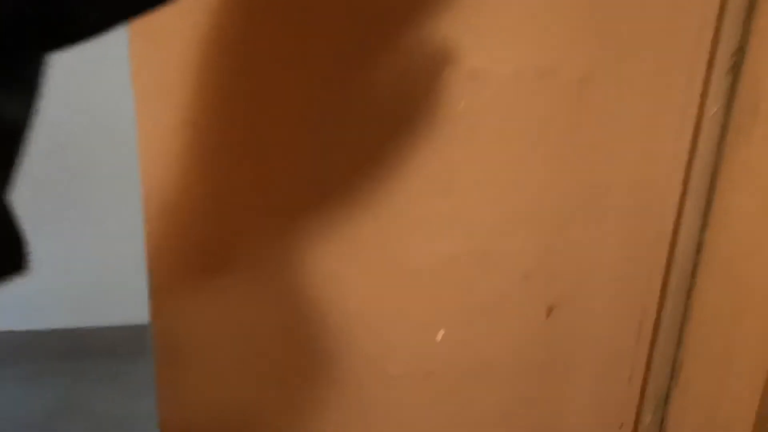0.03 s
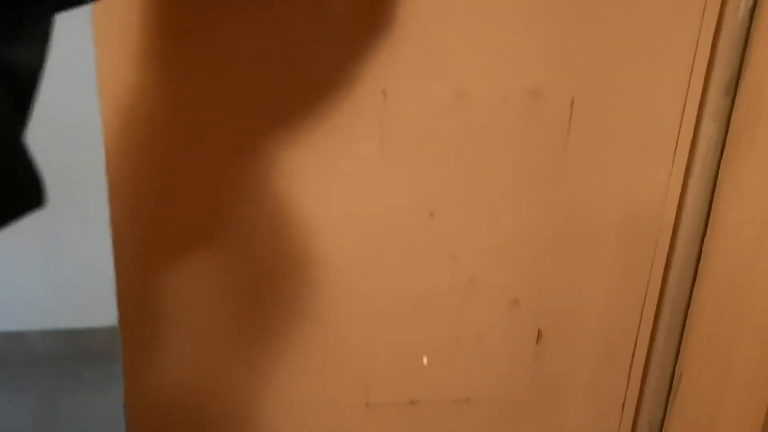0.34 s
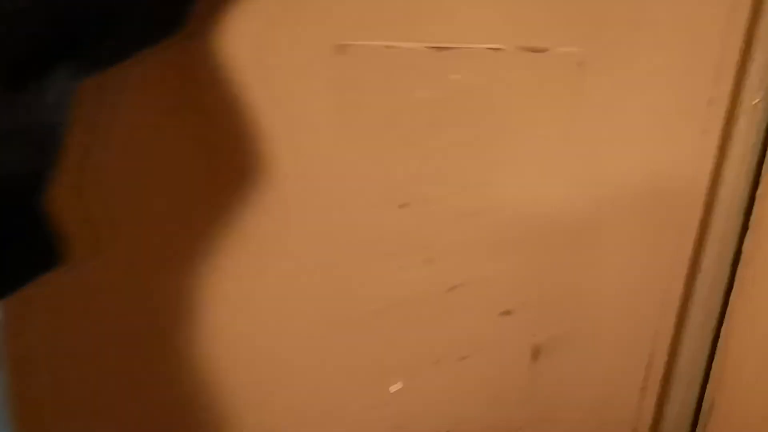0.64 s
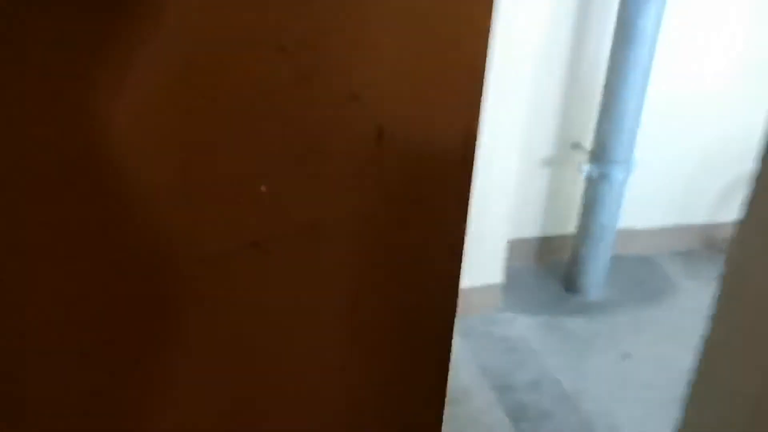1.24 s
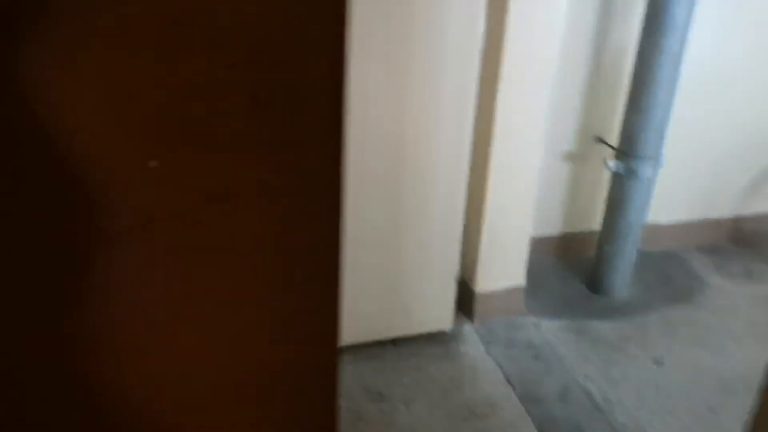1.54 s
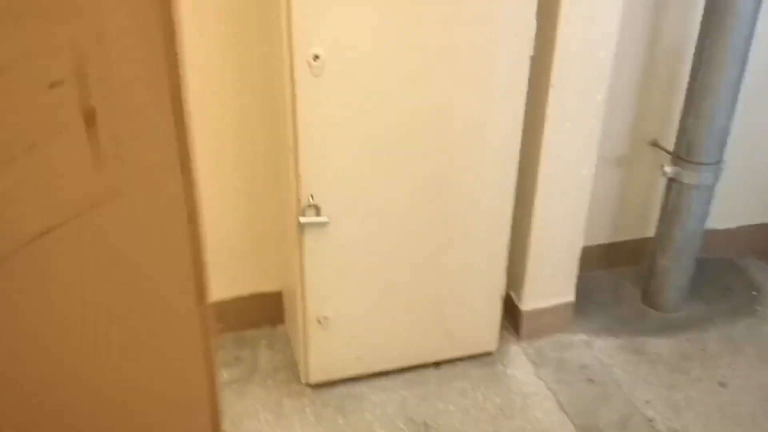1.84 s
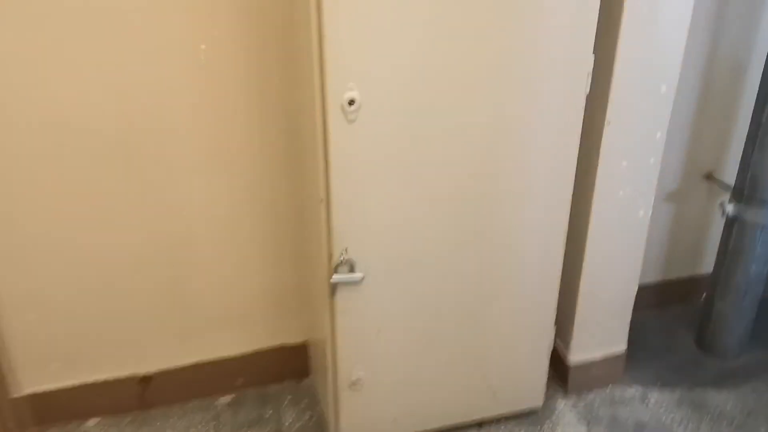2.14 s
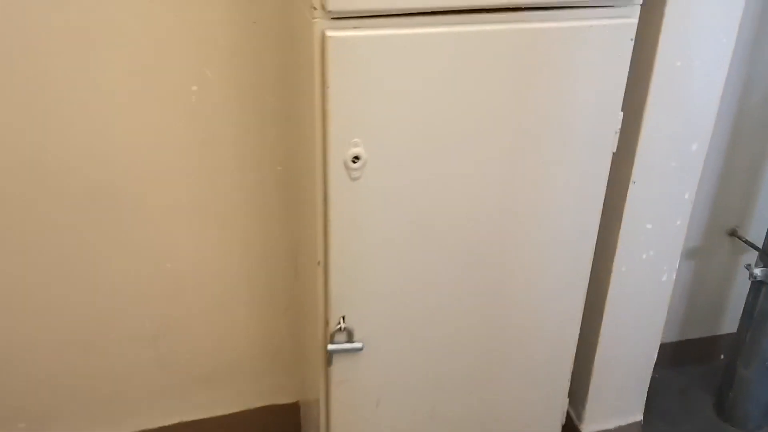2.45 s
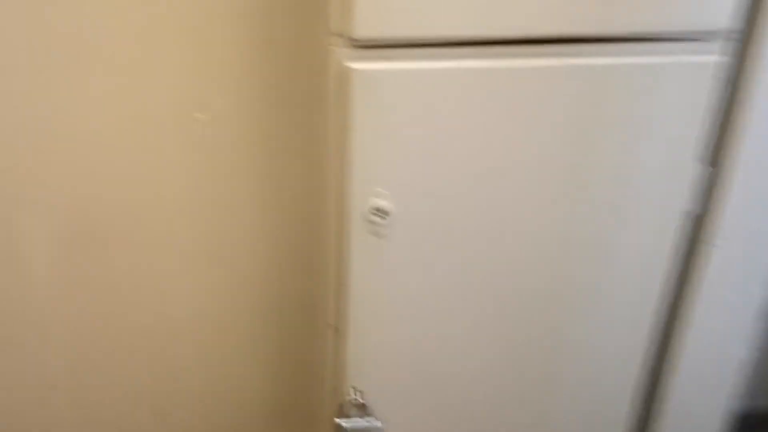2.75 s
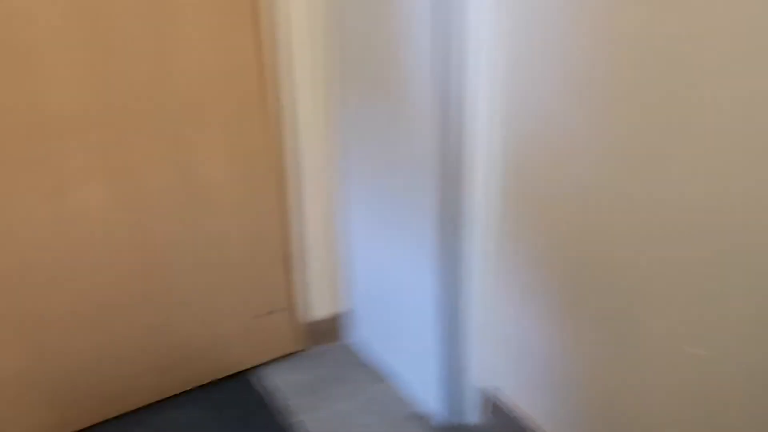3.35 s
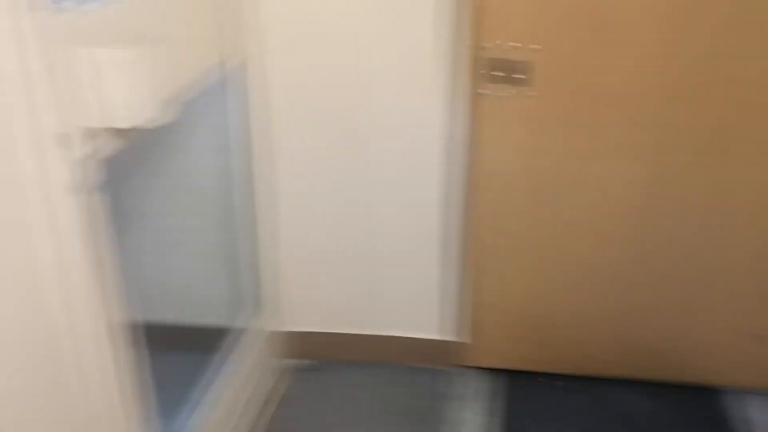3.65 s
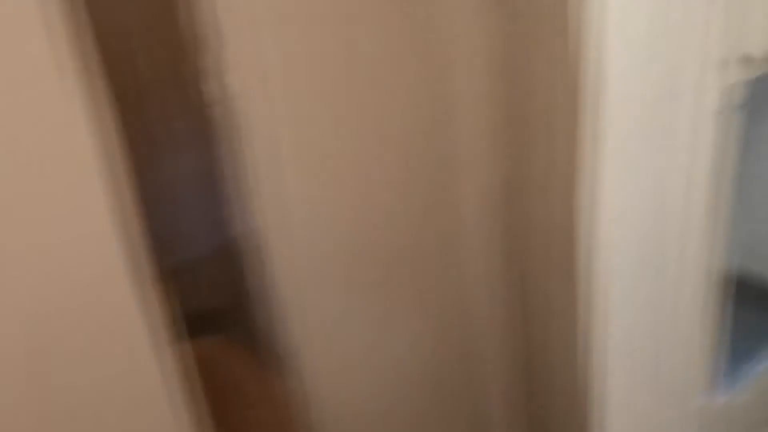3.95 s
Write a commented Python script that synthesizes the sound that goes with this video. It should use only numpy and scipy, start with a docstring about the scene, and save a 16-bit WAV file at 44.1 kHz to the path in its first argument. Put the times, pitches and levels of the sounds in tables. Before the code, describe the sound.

A door latch scrapes and clacks twice as the wooden door booms, echoing in a hard-walled corridor. Then keys clink, shoes scuff on concrete and a jacket rustles close to a hand-held microphone, over low handling rumble.

```python
"""Through a wooden door into a corridor

A hard-walled corridor, heard on the move from the two microphone ports of a hand-held phone.
The door leaf booms; the latch bolt scrapes and clacks twice, ringing with its plate, and the walls answer.
Then keys knock together, shoes scuff on concrete and a jacket rustles, its sleeve right by the phone.
Handling rumble and a soft hiss lie underneath; the left port is muffled in the lower treble."""
import sys
import numpy as np
from scipy import signal
from scipy.fft import rfft, irfft
from scipy.io import wavfile
from scipy.ndimage import uniform_filter1d

SR = 44100
rng = np.random.default_rng(int(sys.argv[2]) if len(sys.argv) > 2 else 0)


def digitize_waveform(pressure):
    """Quantize a signal to 16-bit integers and store it at the path in sys.argv[1].

    Rows of a 2-D input are taken as channels; values are limited to [-1, 1].
    """
    field = np.atleast_2d(pressure).T
    bounded = np.clip(field, -1, 1)
    quanta = np.round(bounded * 32767).astype(np.int16)
    wavfile.write(sys.argv[1], SR, quanta)


N = 176400

# Course of the handling rumble and of the hiss: time_s, relative_level_db
RUMBLE_LEVELS = [(0, -18), (.42, -19), (.7, -30.5), (.98, -36.5), (1.29, -37.5), (1.34, -28), (1.45, -33.5),
                 (1.9, -47.5), (2.2, -36), (2.28, -27), (2.37, -25), (2.41, -39.5), (2.8, -48.5),
                 (2.92, -28.5), (3.5, -35), (3.66, -36.5), (3.81, -25.5), (3.85, -41), (4, -22)]
HISS_LEVELS = [(0, -32.5), (.3, -48.5), (.55, -55), (.9, -45), (1.4, -46), (2.2, -43.5), (2.75, -47),
               (3.5, -41), (4, -44)]
# Dull thuds of door and feet: start_s, rise_s, hold_s, t60_s, relative_level_db, tilt_db_per_octave
THUDS = [(-.02, 0.015, 0.16, 1.25, -24, -4), (0.315, 0.022, 0.017, 0.67, -29, -7.5),
         (0.581, 0.027, 0.057, 0.34, -39, -7), (0.72, 0.027, 0.014, 1.9, -34, -1.5),
         (0.945, 0.019, 0.019, 0.85, -36, 1), (1.596, 0.12, 0.066, 0.84, -39, 0),
         (1.73, 0.01, 0.0073, 0.55, -41.5, -9), (2.097, 0.016, 0.026, 0.66, -46.5, -11),
         (2.873, 0.037, 0.1, 3.7, -42.5, 4.5), (3.206, 0.035, 0.27, 1.33, -37.5, 7.5),
         (3.903, 0.095, 0.045, 0.35, -44.5, -10.5)]
# Standing waves of the corridor: pitch_hz, width_hz, gain_db
CORRIDOR_MODES = [(109, 22, -1.5), (141.1, 13.7, -0.5), (172.5, 11, -7), (206.7, 9.2, -4.5),
                  (236.1, 4.9, -7.5), (265.5, 24.4, -3), (303.8, 14.3, -6), (346.6, 17, -9.5),
                  (456, 160, -18), (530.7, 25, -19)]
# Jacket swishes: start_s, rise_s, hold_s, t60_s, level_db, relative_sheen_db
SWISHES = [(0.646, 0.071, .03, 0.37, -41, -0.5), (0.85, 0.018, 0.046, 1, -44, -3),
           (1.109, 0.071, 0.012, 0.13, -42.5, 6.5), (1.942, 0.11, 0.14, 1, -58, 9.5),
           (2.861, 0.025, 0.14, 1, -38.5, -13), (3.135, 0.056, 0.12, .5, -40.5, -1.5),
           (3.254, 0.035, 0.045, 0.79, -36, 2.5), (3.378, 0.025, 0.023, 0.29, -46, 6.5),
           (3.636, 0.049, 0.02, 0.59, -43, -25), (3.895, 0.0066, 0.13, .5, -39, -5)]
# Cloth and soles dragging with a narrow rasp: start_s, rise_s, hold_s, t60_s, level_db, pitch_hz
RASPS = [(1.155, .015, .015, 0.13, -38, 1970), (2.943, 0.021, 0.022, .15, -44, 2000),
         (3.418, .02, .03, 0.69, -45, 1090)]
# Sleeve brushes, shoe scuffs, door boom and bolt scrapes: start_s, rise_s, hold_s, t60_s, level_db
SLEEVE_BRUSHES = [(1.15, 0.034, .02, 0.22, -62), (2.86, 0.007, .04, 0.56, -51.5),
                  (3.06, 0.014, 0.14, 0.43, -53), (3.27, .02, 0.16, 0.26, -55),
                  (3.897, 0.0033, 0.015, 0.61, -56)]
SHOE_SCUFFS = [(.94, 0.028, 0.011, 0.14, -37), (1.41, 0.0072, 0.017, 1, -45),
               (1.53, 0.077, 0.064, 0.37, -30.5), (1.71, 0.029, 0.0084, 0.54, -35),
               (2.05, 0.017, 0.1, 0.65, -42), (2.27, 0.018, 0.015, 0.69, -43),
               (3.18, 0.021, 0.063, 0.32, -42), (3.41, 0.0099, 0.023, 1, -42.5)]
DOOR_BOOM = [(-0.059, 0.12, 0.027, 0.73, -9.5)]
BOLT_DRAGS = [(-.02, 0.017, 0.093, 0.53, -38.5), (.06, 0.012, 0.051, 0.95, -31.5),
              (.605, 0.003, 0.019, 0.32, -35.5)]
# Small dry taps: start_s, level_db, pitch_hz, width_hz, t60_s
TAPS = [(1.254, -33.5, 2780, 260, 0.13), (1.6489, -27, 3850, 1480, 0.02),
        (2.6635, -30.5, 2760, 1390, 0.011), (2.886, -31, 2460, 1800, 0.026)]
# Key contacts: start_s, long_key_db, short_key_db, key_ring_db
CLINKS = [(1.078, -40, -79, -75), (1.126, -42.5, -62, -75), (1.431, -40.5, -38.5, -55),
          (1.537, -43, -29, -52), (1.5693, -44, -29, -50.5), (1.585, -45, -28, -61),
          (1.592, -31.5, -31, -62), (1.604, -30.5, -37, -64), (1.628, -38, -31, -72),
          (1.7254, -32.5, -62, -78), (1.75, -29.5, -32.5, -55), (2.0612, -28.5, -43, -55),
          (2.1027, -28, -35.5, -50), (2.2643, -38, -43, -73), (2.2843, -37, -46, -75),
          (2.424, -46, -35.5, -72), (2.5362, -52, -41, -60.5), (2.8932, -32.5, -38, -59),
          (3.0096, -32.5, -53, -58), (3.0765, -23.5, -52, -53), (3.111, -26, -60, -82),
          (3.1814, -31, -38, -55)]
# Snaps of the latch spring: start_s, level_db, t60_s
SNAPS = [(0.1634, -36, .05), (0.702, -44, 0.36)]
# Latch clacks: start_s, noise_db, bolt_db, plate_db, build_up_s, tilt_db_per_octave
CLACKS = [(0.1634, -14, -21, -44, 0.017, 0.4), (0.7016, -16, -33.5, -22.5, 0.0049, 0.65)]
# Modes of two keys, their ring, the bolt and the lock plate: pitch_hz, gain_db, t60_s
LONG_KEY_MODES = [(1478, -19, 0.27), (2704, -5, 0.19), (4180, -11, 0.18), (6230, -1.5, 0.14),
                  (6270, -15.5, 0.11)]
SHORT_KEY_MODES = [(2550, -5, 0.1), (4490, -0.5, 0.076), (4290, -9.5, 0.044), (5250, -8, 0.078),
                   (8060, -20, 0.068), (11940, -29, 0.066)]
KEY_RING_MODES = [(7100, 2, 0.18), (8450, -4, 0.11), (9470, -7.5, .11), (10460, -3, 0.098),
                  (12380, -5, .11), (14000, -16, 0.072), (14340, -10, 0.074)]
BOLT_MODES = [(406, -5.5, 0.57), (449.6, -8.5, 0.9), (970, -20, 0.15), (1810, 2, 0.22), (1865, 1.5, 0.18),
              (2520, 10.5, 0.16), (2610, 9, 0.18), (2747, 7, 0.18), (2995, 7, 0.16), (3340, -1.5, 0.2),
              (3460, 2, 0.14), (4010, -7.5, 0.32)]
PLATE_MODES = [(437, -5, 0.34), (650, -11.5, 0.26), (980, -7, 0.25), (1169, -4.5, 0.42), (1408, 3.5, 0.28),
               (1595, 1.5, .16), (1780, 1, 0.12), (2040, 2, 0.2), (2430, 1, 0.2), (3100, -8.5, 0.18),
               (4300, -8, 0.44)]
# Spectrum of the noise in each source: frequency_hz, gain_db
RUMBLE_COLOUR = [(12, 8.5), (25, 15), (45, 5.5), (65, 4.5), (100, -3.5), (140, -5.5), (300, -63)]
HISS_COLOUR = [(59, -44), (100, 10), (733, -15), (814, -5.5), (1320, -6.5), (1650, -4), (2860, 0.5),
               (3110, -4), (4940, -7), (6620, -19), (7510, -20.5), (10900, -39), (15000, -35)]
THUD_COLOUR = [(60, 6.5), (105, -16), (145, 2.5), (200, -0.5), (260, -6), (340, -17.5), (450, -10.5),
               (650, -19.5), (1500, -68.5)]
CLOTH_COLOUR = [(300, -10.5), (700, -10.5), (1300, -7), (2000, -1.5), (2800, 1.5), (4000, -6.5),
                (5500, -12), (8200, -25), (10000, -35), (15000, -38)]
SHEEN_COLOUR = [(1000, -44), (2400, -12), (3500, 4), (4800, -1.5), (6300, -7.5), (8500, -20), (10000, -29),
                (15000, -39)]
BRUSH_COLOUR = [(1500, -19), (4500, 0), (8000, -3), (11000, -12), (15000, -13)]
SCUFF_COLOUR = [(150, -3), (400, -7), (600, -3), (900, -1), (1500, -3), (2600, -0.5), (4000, -14.5),
                (6000, -23), (15000, -61)]
TICK_COLOUR = [(500, -2), (2500, -2), (5000, -17), (8000, -12), (11000, 5), (15000, -12)]
DRAG_COLOUR = [(500, -32), (950, -5), (1500, -9.5), (2200, 5), (2900, -1.5), (4000, -5), (5500, -18),
               (8500, -29.5), (10200, -57)]
SNAP_COLOUR = [(2000, -24), (6000, -7), (8500, 8), (10000, -3), (15000, -13)]
CLACK_COLOUR = [(100, -23), (200, -10), (380, -0.5), (600, -10), (1000, -1), (1450, -9.5), (1900, -1.5),
                (2800, 3.5), (4000, -4), (5600, -9), (8500, -25.5), (10500, -50), (15000, -56)]
# Response of the left microphone port: frequency_hz, gain_db
LEFT_PORT = [(150, 0.5), (400, -2.5), (800, -0.5), (1300, -3.5), (2300, -11), (4300, -16), (6200, -9),
             (7300, 0.5), (8200, 7), (10000, 0)]

CONTACT_S = 0.0006  # onset of metal striking metal


def undb(db):
    """Decibels to gain."""
    return 10 ** (np.asarray(db) / 20)


def unit(x):
    """Scale to an rms of 1."""
    return x / np.sqrt(np.mean(x ** 2))


def clock():
    """Time of every sample in seconds."""
    return np.arange(N) / SR


def freqs():
    """Frequency of every bin, at least 1 Hz."""
    return np.maximum(np.arange(N // 2 + 1) * SR / N, 1)


def colour(x, points):
    """Filter by (frequency_hz, gain_db) points."""
    hz, db = np.array(points, float).T
    gain = undb(np.interp(np.log(freqs()), np.log(hz), db))
    return irfft(rfft(x) * gain, N)


def resonance(x, hz, width_hz):
    """Band-pass with steep skirts."""
    f = freqs()
    return irfft(rfft(x) / (1 + ((f / hz - hz / f) * hz / width_hz) ** 2), N)


def noise(points, alike_below_hz=390):
    """Coloured noise at the two ports, alike in the bass and unrelated in the treble."""
    mid, side = rfft(rng.standard_normal((2, N)))
    alike = 1 / (1 + (freqs() / alike_below_hz) ** 4)
    mid, side = mid * np.sqrt(1 + alike), side * np.sqrt(1 - alike)
    ports = irfft(np.array([mid + side, mid - side]), N)
    return unit(colour(ports, points))


def fall(age_s, t60_s):
    """Full level until age zero, then 60 dB down every t60_s."""
    return np.exp(-np.log(1000) * np.maximum(age_s, 0) / t60_s)


def decay(start_s, t60_s):
    """Sudden onset and exponential fall."""
    age = clock() - start_s
    return (age >= 0) * fall(age, t60_s)


def swells(rows):
    """Rise, hold and release from the first five columns of each row, summed in power."""
    t, power = clock(), 0
    for start, rise, hold, t60, db, *_ in rows:
        attack = np.clip((t - start) / rise, 0, 1)
        power += (undb(db) * attack * fall(t - start - rise - hold, t60)) ** 2
    return np.sqrt(power)


def grain(rate_hz, spread_db):
    """Random flicker of level; when fast, the catch and slip of a rubbing surface."""
    steps = rng.standard_normal(N // 8)
    return unit(undb(spread_db * np.interp(clock() * rate_hz, np.arange(len(steps)), steps)))


def wander(t, rate_hz):
    """Drifting amplitude and phase at each port."""
    steps = rng.standard_normal((2, 1000)) + 1j * rng.standard_normal((2, 1000))
    return np.array([np.interp(t * rate_hz, np.arange(len(port)), port) for port in steps])


def struck_metal(modes, scatter_db, room_db, room_t60_s, chatter=0, detune=0):
    """One second of ringing modes; chatter makes them flutter, the walls return them adrift in phase."""
    t = np.arange(SR) / SR
    out = np.zeros((2, SR))
    echo = undb(room_db) * (1 - np.exp(-t / 0.0042)) * fall(t, room_t60_s)
    flutter, paths = wander(t, rate_hz=263.6), wander(t, rate_hz=91.84)
    for hz, db, t60 in modes:
        gain = undb(db + scatter_db * rng.standard_normal())
        phase = rng.uniform(0, 2 * np.pi, (2, 1))
        shift = rng.integers(SR)
        pitch_hz = hz * (1 + detune * rng.standard_normal())
        direct = np.exp(1j * phase) + chatter * np.roll(flutter, shift, axis=1)
        direct *= fall(t, t60) / np.hypot(1, chatter)
        reflected = echo * np.roll(paths, shift, axis=1)
        out += gain * ((direct + reflected) * np.exp(2j * np.pi * pitch_hz * t)).imag
    return out * (1 - np.exp(-(t / CONTACT_S) ** 2))


def add(out, start_s, x):
    """Mix a short sound in at a time."""
    i = int(start_s * SR)
    out[:, i:i + x.shape[1]] += x[:, :N - i]


def hiss():
    """A soft, wavering hiss behind everything, dipping while the door opens."""
    level_db = np.interp(clock(), *np.array(HISS_LEVELS).T)
    return undb(level_db) * noise(HISS_COLOUR) * grain(rate_hz=18, spread_db=0.9)


def handling_rumble(trim_db=-3.5):
    """The hand shifts on the body of the phone."""
    level_db = np.interp(clock(), *np.array(RUMBLE_LEVELS).T)
    return undb(level_db + trim_db) * noise(RUMBLE_COLOUR)


def corridor_thuds(diffuse_db=-5, standing_db=-7.5):
    """Dull blows excite the standing waves of the corridor and a diffuse murk between them."""
    out = undb(diffuse_db) * swells(THUDS) * noise(THUD_COLOUR)
    push = noise(THUD_COLOUR)
    for hz, width, db in CORRIDOR_MODES:
        blows = [(*shape, level + tilt * np.log2(hz / 200)) for *shape, level, tilt in THUDS]
        out += undb(standing_db + db) * swells(blows) * unit(resonance(push, hz, width))
    return out


def jacket():
    """The walker's jacket swishes, with a brighter sheen when the cloth slides fast."""
    cloth = swells(SWISHES) * noise(CLOTH_COLOUR)
    sheen_rows = [(*shape, db + sheen_db) for *shape, db, sheen_db in SWISHES]
    sheen = swells(sheen_rows) * noise(SHEEN_COLOUR)
    return (cloth + sheen) * grain(rate_hz=430, spread_db=2.1)


def sleeve():
    """The sleeve brushes right beside the ports with a fine crackle."""
    return swells(SLEEVE_BRUSHES) * noise(BRUSH_COLOUR) * grain(rate_hz=590, spread_db=4)


def rasps():
    """Cloth and soles catch and slip as they drag, each rasp in one narrow resonance."""
    slips = rng.standard_normal((2, N)) * grain(rate_hz=240, spread_db=6.5)
    return sum(swells([shape]) * unit(resonance(slips, hz, width_hz=0.12 * hz)) for *shape, hz in RASPS)


def shoes():
    """Soles scuff on the gritty concrete below the phone."""
    return swells(SHOE_SCUFFS) * noise(SCUFF_COLOUR) * grain(rate_hz=520, spread_db=2)


def taps():
    """Light knocks of small hardware and grit, each in one resonance."""
    out = np.zeros((2, N))
    for start, db, hz, width, t60 in TAPS:
        push = rng.standard_normal((2, N))
        knock = resonance(push * decay(start, t60), hz, width)
        out += undb(db) * knock / np.std(resonance(push, hz, width))
    return out


def keys(port_spread_db=1.1, bounce_db=-7, bounce_gap_s=0.022, clash_db=-5, tick_db=6):
    """Two keys and their ring knock together: a bright tick, a rough clash, a tone, one weak bounce."""
    out = np.zeros((2, N))
    for part, modes in enumerate((LONG_KEY_MODES, SHORT_KEY_MODES, KEY_RING_MODES)):
        clashes = np.zeros(N)
        for start, *levels_db in CLINKS:
            port_gains = undb(levels_db[part] + port_spread_db * rng.standard_normal((2, 1)))
            tone = port_gains * struck_metal(modes, scatter_db=2, room_db=-25.5, room_t60_s=0.96,
                                             chatter=0.62, detune=0.002)
            add(out, start, tone)
            add(out, start + bounce_gap_s * rng.uniform(0.5, 1.7), undb(bounce_db) * tone)
            clashes += undb(levels_db[part]) * decay(start, t60_s=0.039)
        push = rng.standard_normal((2, N))
        rattle = unit(sum(undb(db) * resonance(push, hz, width_hz=450) for hz, db, _ in modes))
        out += undb(clash_db) * uniform_filter1d(clashes, int(CONTACT_S * SR)) * rattle
    ticks = sum(undb(ring_db) * decay(start, t60_s=0.019) for start, _, _, ring_db in CLINKS)
    return out + undb(tick_db) * ticks * noise(TICK_COLOUR)


def door_boom(pitch_hz=52.95, overtone_db=-18):
    """The door leaf shudders at its lowest mode, with a weaker overtone."""
    phase = 2 * np.pi * pitch_hz * clock()
    overtone = undb(overtone_db) * np.sin(1.5 * phase + rng.uniform(0, 2 * np.pi))
    return swells(DOOR_BOOM) * np.sqrt(2) * (np.sin(phase) + overtone)


def bolt_drag():
    """The bolt scrapes along its plate before each clack."""
    return swells(BOLT_DRAGS) * noise(DRAG_COLOUR) * grain(rate_hz=810, spread_db=0.2)


def spring_snap():
    """The latch spring puts a bright snap on top of each clack."""
    return noise(SNAP_COLOUR) * sum(undb(db) * decay(start, t60) for start, db, t60 in SNAPS)


def latch(corridor_db=-16):
    """At arm's length the bolt snaps and the plate rings; door leaf and corridor carry the clack on."""
    out = np.zeros((2, N))
    for start, noise_db, bolt_db, plate_db, build_up_s, tilt in CLACKS:
        bright = [(hz, db + tilt * np.log2(hz / 2000)) for hz, db in CLACK_COLOUR]
        dull = [(hz, db - 10 * np.log2(1 + hz / 1500)) for hz, db in bright]
        clack = noise(bright) * decay(start, t60_s=0.31)
        tail = undb(corridor_db) * noise(dull) * decay(start, t60_s=0.99)
        hit = undb(noise_db) * (clack + tail)
        for modes, ring_db in (BOLT_MODES, bolt_db), (PLATE_MODES, plate_db):
            tone = struck_metal(modes, scatter_db=1, room_db=-13, room_t60_s=0.48)
            add(hit, start, undb(ring_db) * tone)
        out += hit * np.sqrt(np.clip((clock() - start) / build_up_s, 0, 1))
    return out


def scene():
    """Door, walker and background as they reach the phone."""
    door = door_boom() + bolt_drag() + latch() + spring_snap()
    walker = taps() + keys() + jacket() + shoes() + rasps() + sleeve()
    return door + walker + corridor_thuds() + hiss() + handling_rumble()


def record(dry, leak_share=0.22, leak_hz=2350, leak_lag_s=0.0006, top_hz=15200):
    """The left port hears a band of the right port's sound late and loses presence; both lose the top."""
    share = leak_share / (1 + np.log2(freqs() / leak_hz) ** 4)
    left, right = rfft(dry)
    leak = share * right * np.exp(-2j * np.pi * freqs() * leak_lag_s)
    left = irfft(np.sqrt(1 - share ** 2) * left + leak, N)
    ports = np.array([colour(left, LEFT_PORT), dry[1]])
    low_pass = signal.ellip(8, 0.2, 70, top_hz, fs=SR, output="sos")
    return signal.sosfilt(low_pass, ports)


dry = scene()
out = record(dry)
digitize_waveform(out)
```